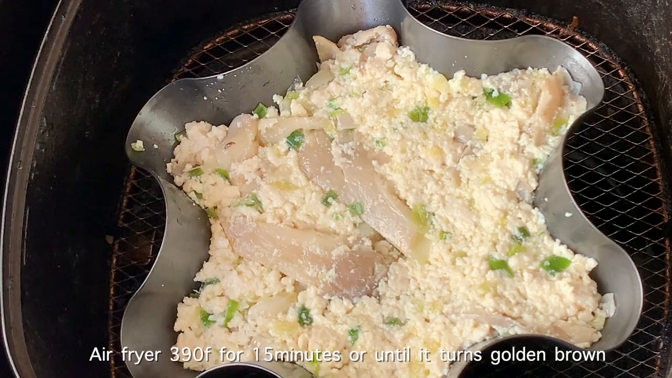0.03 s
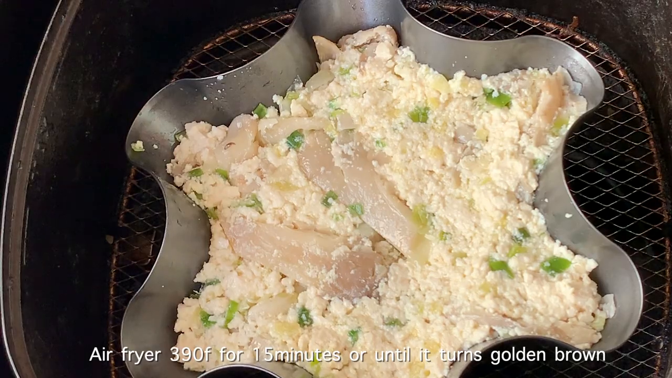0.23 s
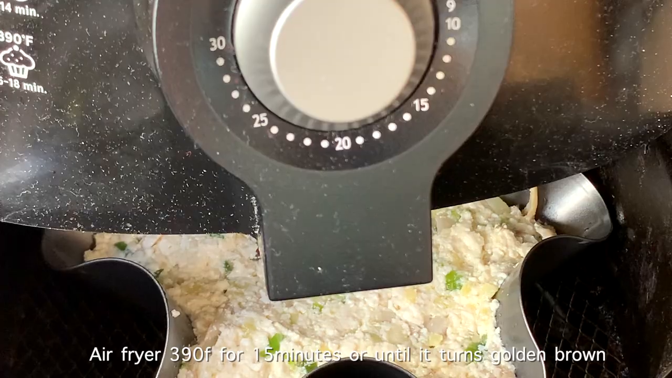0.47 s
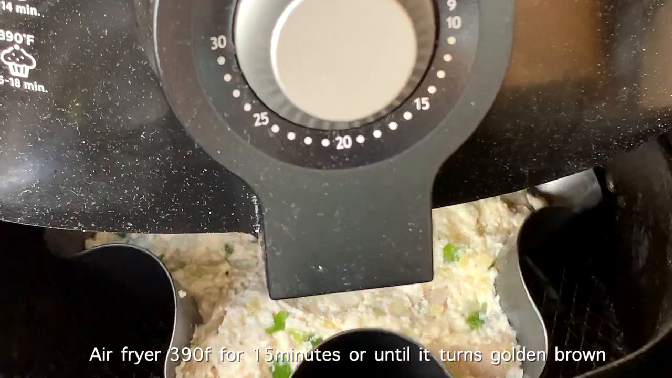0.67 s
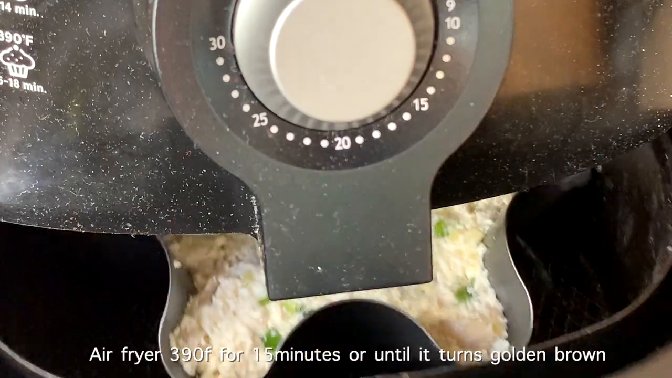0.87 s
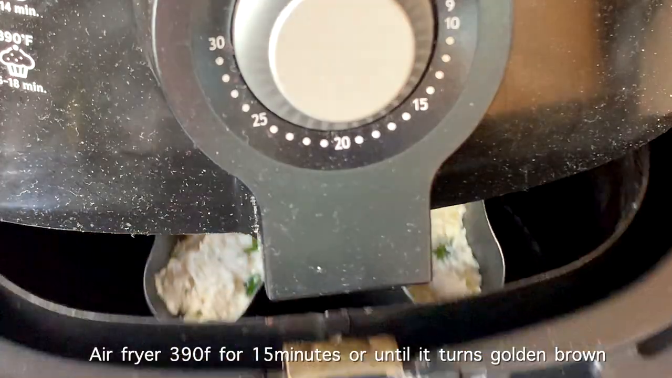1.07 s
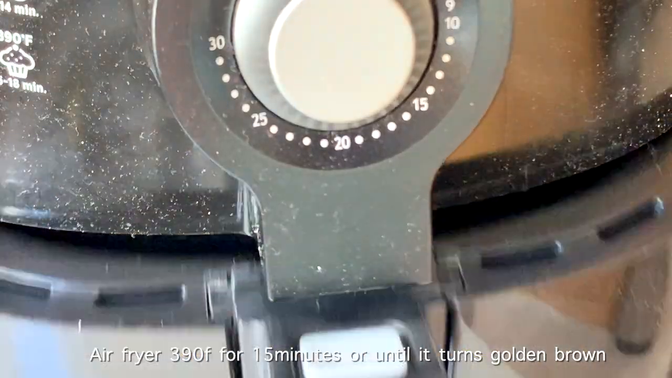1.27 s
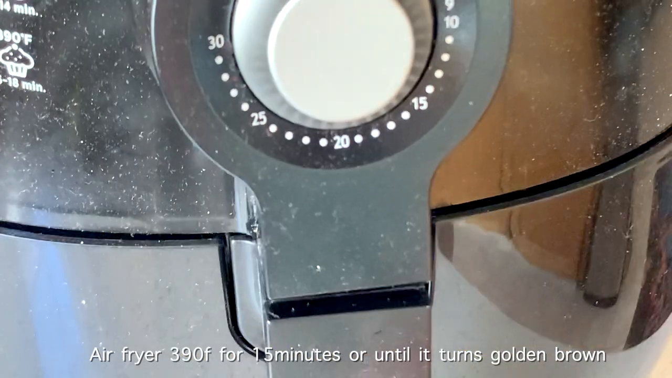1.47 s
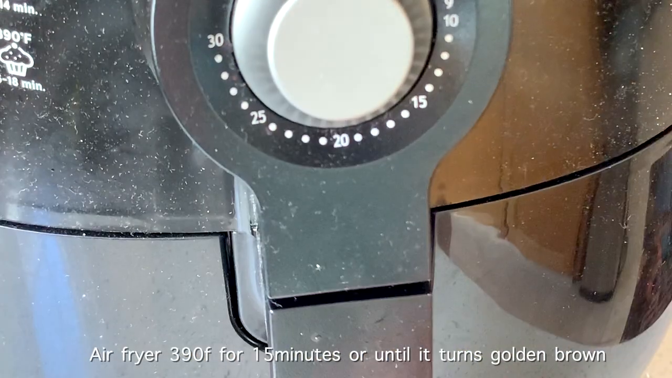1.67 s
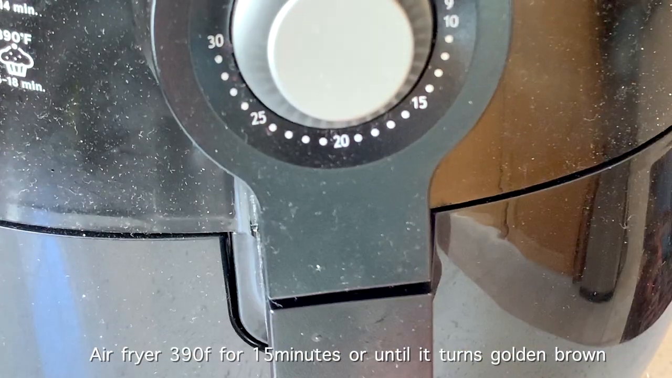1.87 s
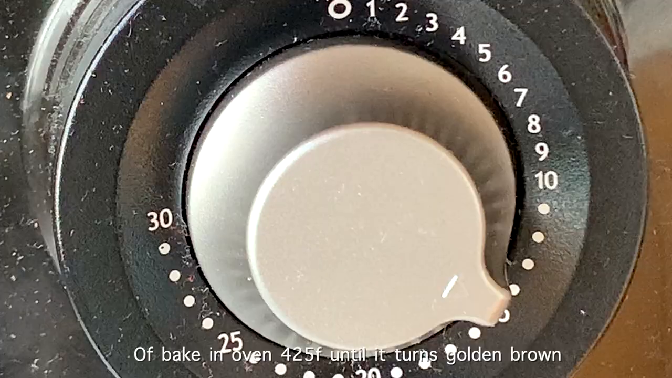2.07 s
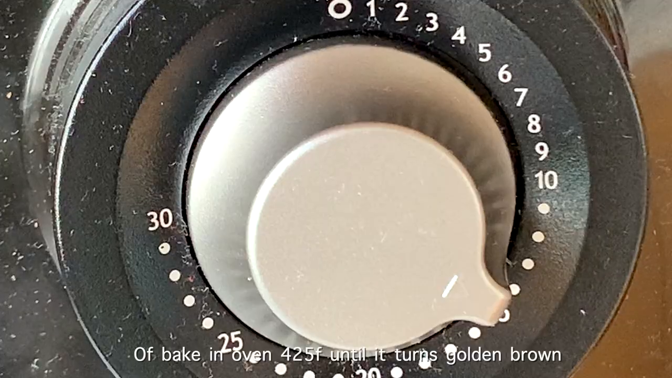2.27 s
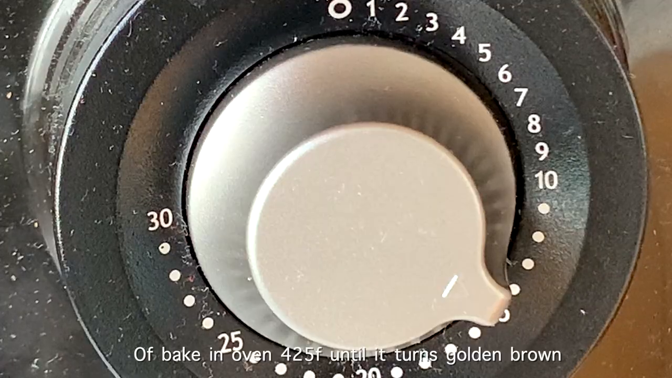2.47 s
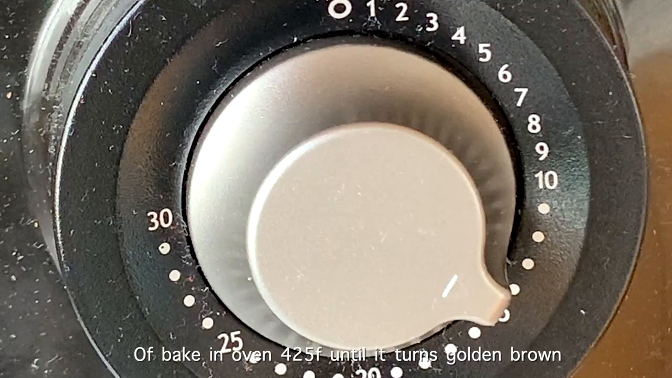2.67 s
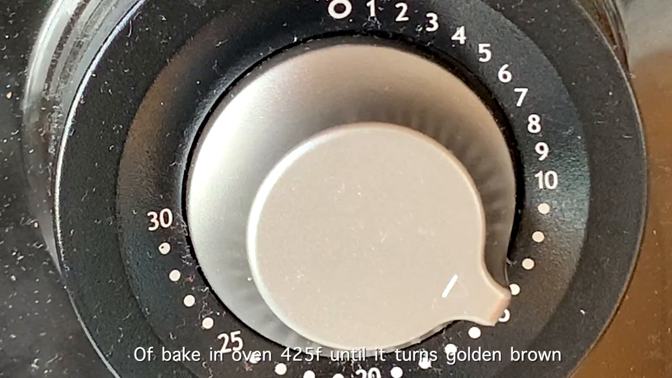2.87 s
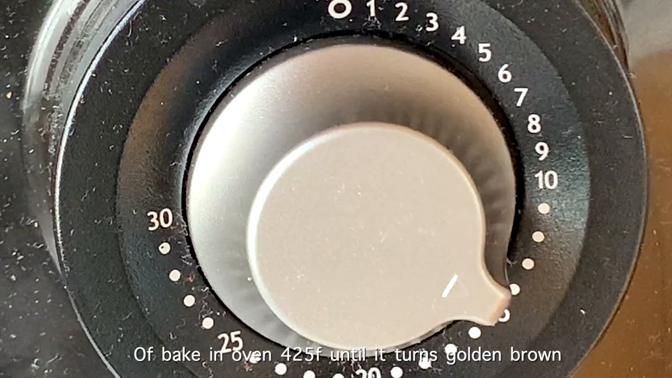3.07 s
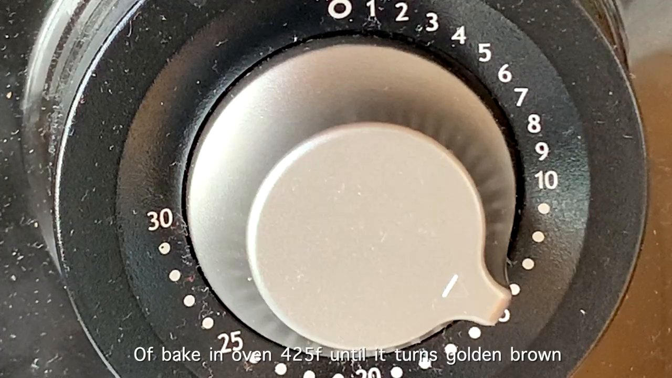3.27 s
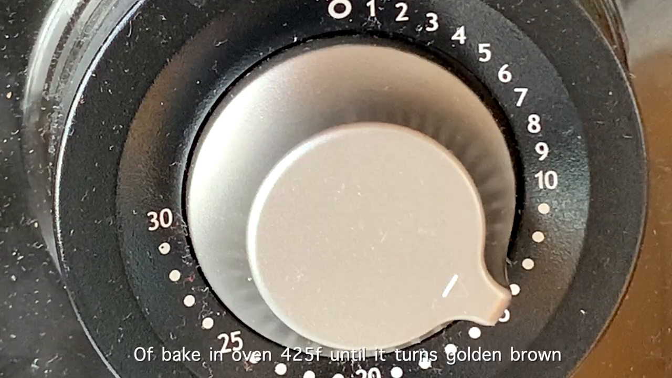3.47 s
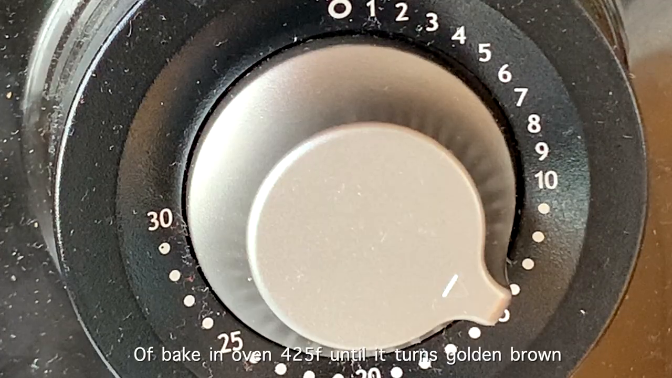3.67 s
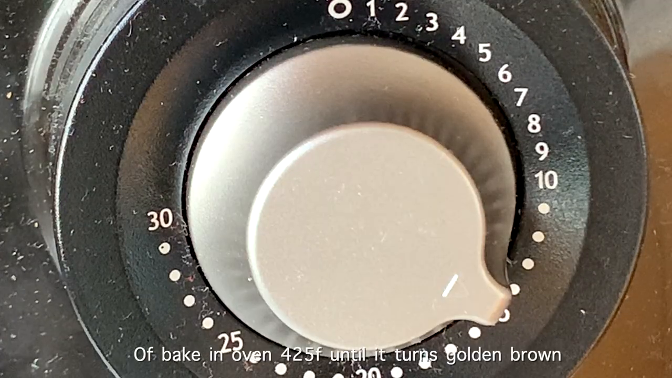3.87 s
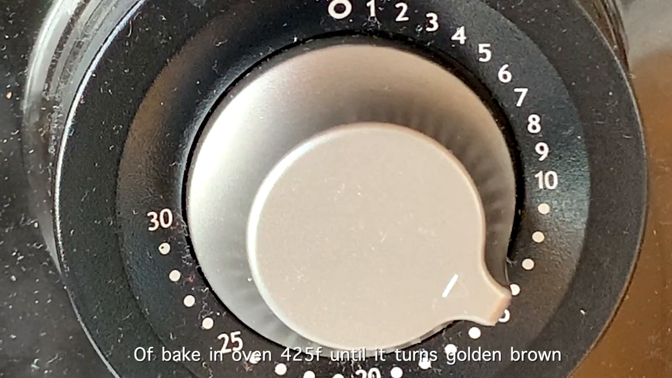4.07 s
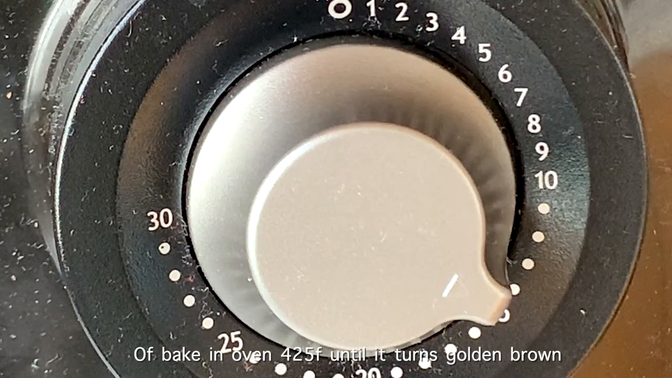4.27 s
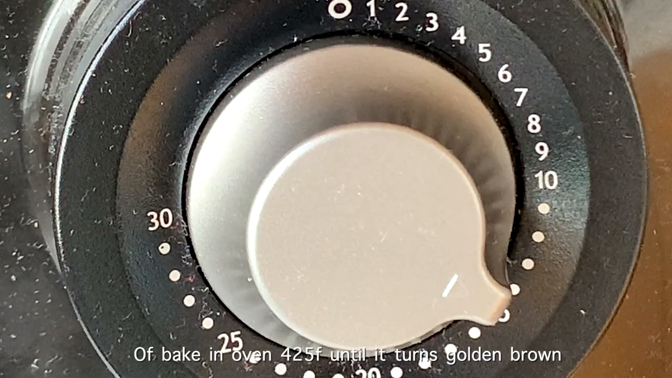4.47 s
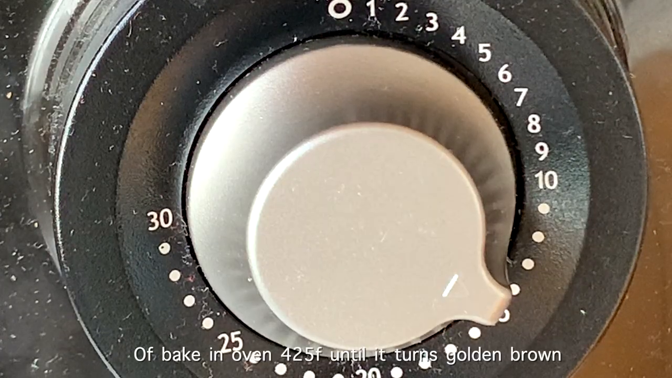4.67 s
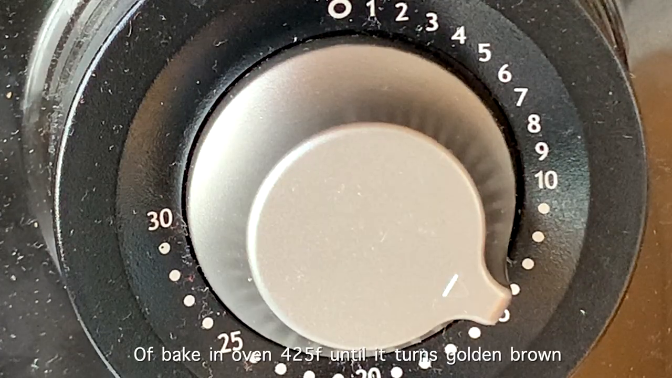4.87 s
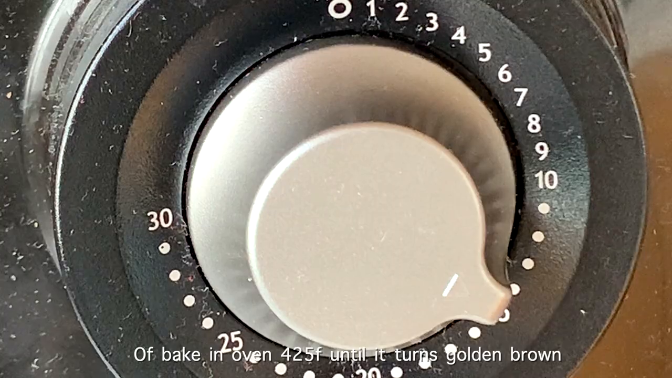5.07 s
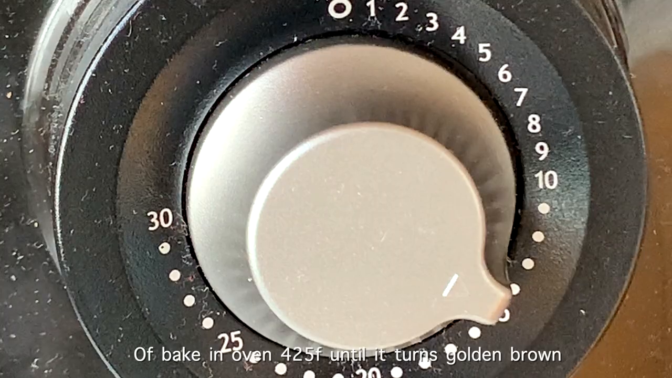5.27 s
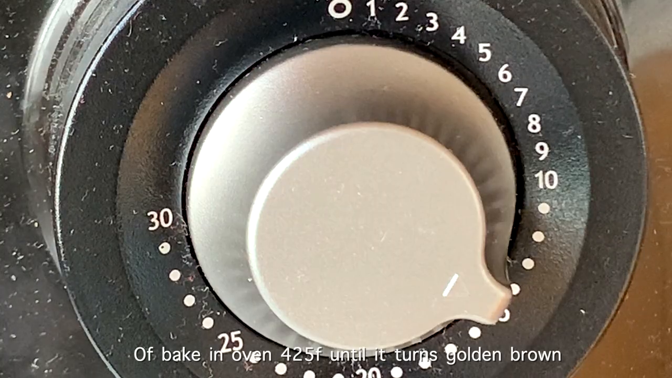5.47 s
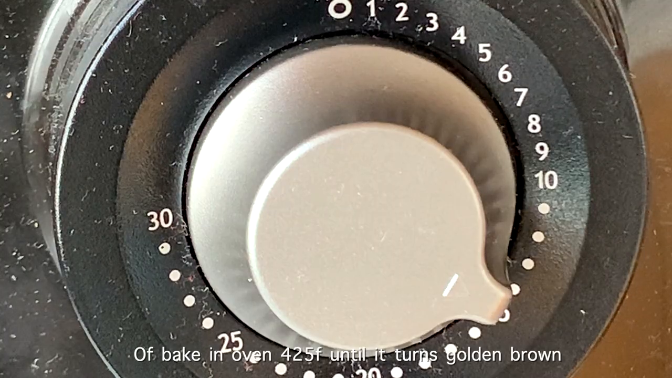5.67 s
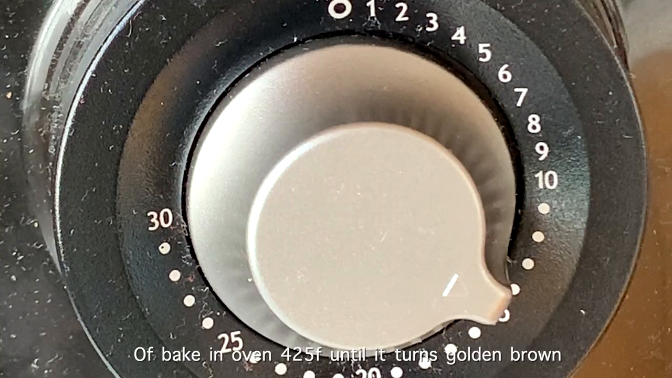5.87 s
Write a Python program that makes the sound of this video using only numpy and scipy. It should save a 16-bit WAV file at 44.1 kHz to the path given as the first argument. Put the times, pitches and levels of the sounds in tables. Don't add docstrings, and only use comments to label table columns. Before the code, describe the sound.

In a quiet, hard-walled kitchen, a hand takes the handle with a faint rub and tiny squeak, then pushes an air fryer basket in: light knocks, gritty scraping, and a dense clatter as it latches with a hollow boom. After a brief fading tail, a hard cut brings the running fryer close to the microphone, a steady low roar with motor hum, rapid ticking and occasional steam hiss.

```python
import sys
import numpy as np
from scipy import signal
from scipy.fft import rfft, irfft, next_fast_len
from scipy.io import wavfile
from scipy.ndimage import uniform_filter1d

SR = 44100
rng = np.random.default_rng(int(sys.argv[2]) if len(sys.argv) > 2 else 0)


def bounce(signal):
    frames = np.transpose(np.atleast_2d(signal))
    limited = np.clip(frames, -1, 1)
    pcm = np.round(limited * 32767).astype(np.int16)
    wavfile.write(sys.argv[1], SR, pcm)


def boost(x):
    u = np.asarray(x, float) / 20
    return 10 ** u


N = 261504
PAD = next_fast_len(N + 4096)
TIME = np.arange(N) / SR
BIN_HZ = np.maximum(np.fft.rfftfreq(PAD, 1 / SR), 1)
CHANGE_S = 2.104
LATCH_S = 1.556

# hz, level_db, t60_s
HOUSING_MODES = [(225, -9, 0.18), (322, -11.5, 0.2), (460, 4, 0.1), (599, -6.5, 0.086), (700, -3, 0.073),
                 (731.4, -2, 0.14), (866, -11.5, 0.34), (975, -12.5, 0.067), (1100, -5.5, .1),
                 (1360, -16.5, .1), (1560, -22, .08), (1870, -17, .08), (2510, -17, .08)]
# start_s, level_db, pitch_hz
HELD_PANELS = [(1.223, -10.5, 225), (1.224, -13.5, 322), (1.367, -15.5, 310), (1.388, -13, 322),
               (1.405, -3, 638), (1.406, -5, 325), (1.418, -6, 177.6), (1.508, -6, 656), (1.515, -7.5, 313),
               (1.520, -17, 150)]
# start_s, level_db, pitch_hz
LOOSE_PANELS = [
    (1.011, -26.5, 254),
    (1.012, -24.5, 710),
    (1.232, -18, 412),
    (1.285, -30.5, 188),
    (1.372, -17, 177.2),
]
# start_s, level_db, pitch_hz
FREE_PANELS = [(.660, -40.5, 256), (.662, -50, 750), (.664, -36, 975), (.665, -38.5, 460), (.70, -41, 225),
               (1.011, -33.5, 1890), (1.011, -36.5, 1075), (1.03, -41.5, 322), (1.222, -25, 2950),
               (1.226, -33, 710), (.36, -67, 720), (1.492, -17, 5000), (1.516, -30, 1800)]


def level(x, db):
    return x * boost(db) / np.sqrt(np.mean(x ** 2))


def over_hz(table):
    hz, db = np.transpose(table)
    return np.interp(np.log(BIN_HZ), np.log(hz), db)


def back(spectrum):
    return irfft(spectrum, PAD)[..., :N]


def band(x, lo_hz, hi_hz):
    sos = signal.butter(2, [lo_hz, min(hi_hz, .45 * SR)], "band", fs=SR, output="sos")
    return signal.sosfilt(sos, x)


def walk(rate_hz):
    hold = int(SR / rate_hz)
    steps = np.repeat(rng.standard_normal(N // hold + 1), hold)
    return 0.92 * uniform_filter1d(uniform_filter1d(steps, hold), hold)[:N]


def stereo(db, mid=None, wide_db=0.):
    # hz, side_minus_mid_db
    width_hz_db = [(60, -15.5), (150, -23), (400, -13), (800, -4.5), (1300, -3.5), (2400, 1), (8000, 0)]
    if mid is None:
        mid = rng.standard_normal(N)
    scrambled = mid * rng.choice([-1., 1.], N)
    side = rfft(scrambled, PAD) * boost(over_hz(width_hz_db) + wide_db)
    return back(boost(db) * (rfft(mid, PAD) + np.array([side, -side])))


def ring(x, hz, t60_s):
    pole = np.exp(2j * np.pi * hz / SR - np.log(1000) / (t60_s * SR))
    return signal.lfilter([1], [1, -pole], x).imag


def swing(table, rise_s):
    out, t = np.zeros(N), TIME[:SR // 2]
    for start_s, db, hz, decay_ms in table:
        envelope = (1 - np.exp(-t / rise_s)) * np.exp(-t * 1000 / decay_ms)
        out[int(start_s * SR):][:len(t)] += boost(db) * np.sin(2 * np.pi * hz * t) * envelope
    return out


def jolt(start_s, rise_s, fall_s):
    t = np.maximum(TIME - start_s, 0)
    return (1 - np.exp(-t / rise_s)) ** 2 * np.exp(-t / fall_s)


def swells(table):
    return sum(boost(db) * np.exp(-np.abs((TIME - s) / half_s) ** 2.6) for s, db, half_s in table)


def knocks():
    # start_s, strength_db, hardness_0_to_1, rattle_ms
    contacts = [(.336, -47.5, 0.4, .5), (0.653, -29.5, 0.05, 19), (.683, -33.5, 0, 3.5),
                (1.005, -24, 0.22, 14.8), (1.217, -26, .65, 14.3), (1.250, -42, .4, 12),
                (1.354, -29, 1, 7.3), (1.365, -20, .37, 11), (1.386, -30, .55, 11), (1.404, -24, 0.6, 7.7),
                (1.417, -30, .45, 13), (1.492, -24.5, 0.84, 5.1), (1.506, -19, .24, 6.8),
                (1.514, -21.5, .15, 7.6), (1.555, -41, .52, 6.2)]
    clack, snap, crack = gains = np.zeros((3, N))
    for start_s, db, hard, rattle_ms in contacts:
        rise_share = 0.38 + (0.17 - 0.38) * hard
        snap_db = -15.5 + (9 + 15.5) * hard
        crack_db = -46 + (14 + 46) * hard
        burst = jolt(start_s, rise_share * rattle_ms / 1000, rattle_ms / 1000)
        gains += np.outer(boost(db + np.array([0, snap_db, crack_db])), burst)
    push = clack * rng.standard_normal(N)
    body = sum(boost(db - 30) * ring(push, hz, t60_s) for hz, db, t60_s in HOUSING_MODES)
    mid_db = over_hz([(250, -17), (600, -6.0), (1800, -11.0), (3500, -25.5), (8000, -42.5)])
    snap_colour_db = over_hz([(1200, -18.5), (2800, 0.5), (5200, -3), (9000, -16), (15000, -32.5)])
    crack_colour_db = over_hz([(3000, -21.5), (6500, 1.5), (10500, 4), (14000, 1.5), (15500, -11.5)])
    mids = level(stereo(mid_db), 0) * clack
    snaps = level(stereo(snap_colour_db), 0) * snap
    cracks = level(stereo(crack_colour_db), 0) * crack
    return body + mids + snaps + cracks


def panel_thuds():
    # start_s, level_db, pitch_hz, decay_ms
    nudges = [
        (.252, -49, 66, 11),
        (.3255, -47, 62, 11),
    ]
    thuds = []
    for table, cycles in ((HELD_PANELS, 1.89), (LOOSE_PANELS, 5.4), (FREE_PANELS, 16.)):
        thuds += [(start_s, db, hz, 1000 * cycles / hz) for start_s, db, hz in table]
    return swing(thuds + nudges, rise_s=0.0021)


def slide():
    # start_s, friction_db
    friction_s_db = [(.5, -90), (.68, -58), (.78, -70.5), (.86, -58.5), (1.19, -55), (1.33, -51.5),
                     (1.39, -35.5), (1.45, -46.5), (1.8, -93)]
    # hz, db_per_hz
    scrape_hz_db = [(350, -29.5), (600, -1.5), (794, -14.5), (864, -3), (1750, -9.5), (2550, -9.5),
                    (4870, -14.5), (11000, -18), (14300, -36), (22000, -120)]
    start_s, friction_db = np.transpose(friction_s_db)
    friction = boost(np.interp(TIME, start_s, friction_db, -140, -140))
    grit = rng.standard_normal(N) * boost(2.0 * rng.exponential(size=N) + 2.0 * walk(56))
    scrape = level(stereo(over_hz(scrape_hz_db[:-2]), grit), 0) * friction
    shake = rng.standard_normal(N) * boost(4 * walk(19))
    modes = sum(boost(db) * ring(shake, hz, t60_s / 3) for hz, db, t60_s in HOUSING_MODES[:5])
    load = boost(-49) * (friction / boost(-58)) ** 0.98 + boost(-73.5)
    return scrape + level(modes, -11) * load


def worktop():
    rise_s = 0.012
    jolts = sum(boost(-44 + .55 * (db + 26)) * jolt(start_s, rise_s, 0.053)
                for start_s, db, hz in HELD_PANELS + LOOSE_PANELS + FREE_PANELS if hz < 260)
    settling = boost(-55.5) * jolt(LATCH_S, rise_s, 0.45)
    shudder = level(band(rng.standard_normal(N), 45, 130), 2.3)
    return shudder * (jolts + boost(-69) + settling)


def handle():
    # centre_s, level_db, half_length_s
    finger_rubs = [
        (.24, -73, .045),
        (.375, -69, 0.042),
    ]
    rub_db = over_hz([(500, -5), (720, -4), (1100, -9.0), (2000, 4.5), (2800, -9), (3700, -2.5),
                      (7000, -12), (13000, -11)])
    rub = level(stereo(rub_db), 0) * swells(finger_rubs)
    squeak_s, squeak_db, half_length_s = .403, -60, 0.019
    squeak_hz, glide_hz_per_s = 451, 420
    hz = (squeak_hz + glide_hz_per_s * (TIME - squeak_s)) * (1 + 0.025 * walk(66))
    squeak = swells([(squeak_s, squeak_db, half_length_s)]) * np.sin(2 * np.pi * np.cumsum(hz) / SR)
    return rub + squeak


def boom():
    # level_db, decay_s
    cavity_stages = [
        (-23.5, .035),
        (-42.5, 0.26),
    ]
    phase = 2 * np.pi * np.cumsum(160 * (1 + 0.013 * walk(30))) / SR
    fade = sum(boost(db) * jolt(LATCH_S, 0.0025, decay_s) for db, decay_s in cavity_stages)
    hum = np.sqrt(2) * fade * boost(3.0 * walk(18)) * np.sin(phase)
    grate = level(band(rng.standard_normal(N), 546, 634), -72) * jolt(LATCH_S, 0.063, 0.65)
    return hum + grate


def room(x):
    # hz, level_db, t60_s
    wall_bands = [(150, -8, 0.47), (400, -17.5, 0.45), (997, -7, 0.51), (2500, -7.5, 0.52),
                  (6140, -7.5, 0.49), (12140, -11.5, 0.35)]
    table_hz, table_db, table_t60_s = np.transpose(wall_bands)
    x = x.mean(axis=0)[:int(CHANGE_S * SR) + 200]
    out = np.zeros((2, N))
    for hz in 110 * np.sqrt(2) ** np.arange(15):
        t60_s = np.interp(hz, table_hz, table_t60_s)
        keep = np.exp(-2 * np.log(1000) / (t60_s * SR))
        energy = uniform_filter1d(band(x, hz / 1.08, hz * 1.26) ** 2, 300, origin=149)
        tail = np.sqrt(np.abs(signal.lfilter([1 - keep], [1, -keep], energy)))
        noise = rng.standard_normal((2, len(x)))
        noise += max(1 - hz / 900, 0) * 1.2 * noise.sum(axis=0)
        diffuse = level(band(noise, hz / 1.19, hz * 1.19), np.interp(hz, table_hz, table_db))
        out[:, :len(x)] += tail * diffuse
    return out


def air_flow():
    # hz, db_per_hz
    air_hz_db = [(15, -52), (25, -43), (47, -19), (96, -13.5), (160, 3), (229, -12), (296, -8),
                 (505, -19.5), (545, -19.5), (619, -24.5), (1400, -24), (2450, -31), (2640, -34),
                 (4630, -35.5), (11000, -43.5), (14300, -110), (22000, -120)]
    # hz, width_hz, gain_db
    duct_modes = [(165, 70, 2.5), (298, 30, 5), (1000, 250, 3), (1093, 20, 5), (1200, 60, -6),
                  (1385, 25, 6), (1783, 30, 6), (2060, 70, 3), (2185, 70, -8), (2240, 30, 4), (2385, 40, 5),
                  (2480, 110, 4), (2650, 150, -4), (2800, 50, 5), (3320, 140, 5), (3420, 60, -5),
                  (3750, 70, 4), (4370, 120, -4), (4630, 180, 6), (4770, 100, -3), (4970, 60, 4),
                  (5300, 500, -3), (5820, 60, 4)]
    colour_db = over_hz(air_hz_db[:-3] + [(9000, -42), (13000, -50.5)])
    colour_db += sum(db / (1 + (2 * (BIN_HZ - hz) / width_hz) ** 2) for hz, width_hz, db in duct_modes)
    ripple = uniform_filter1d(uniform_filter1d(rng.standard_normal(len(BIN_HZ)), 120), 120)
    colour_db += 1.6 * np.sqrt(180) * ripple * (BIN_HZ > 350)
    air = rfft(level(stereo(colour_db), -32.5), PAD)
    swell, out = walk(2.235), 0
    for lo_hz in 2. ** np.arange(5, 15):
        octave = back(air * ((BIN_HZ >= lo_hz) & (BIN_HZ < 2 * lo_hz)))
        out = out + octave * boost(.35 * swell + .7 * walk(12))
    return out


def motor():
    # shaft_multiple, level_db
    shaft_tones = [
        (1, -56),
        (2, -52),
        (11, -42),
        (22, -68),
    ]
    shaft_hz = 547.4 / 11
    turn = 2 * np.pi * np.cumsum(shaft_hz * (1 + 0.0014 * walk(2.86))) / SR
    return sum(np.sqrt(2) * boost(db + 0.6 * walk(17)) * np.sin(k * turn + k) for k, db in shaft_tones)


def vent():
    # centre_s, level_db, half_length_s
    steam_spits = [
        (2.765, -66.5, .012),
        (3.842, -54.5, .012),
        (4.74, -47, 0.076),
        (5.49, -60, .04),
    ]
    hiss = level(stereo(over_hz([(3000, -8.0), (8000, -10.0), (12500, -11.0), (15000, -5.5)])), 2.5)
    return hiss * (boost(-66 + 1.2 * walk(3)) + swells(steam_spits))


def whistles():
    # hz, width_hz, level_db
    casing_gaps = [(790, 60, -58), (1093, 25, -63), (1385, 25, -62), (1783, 25, -64), (2420, 60, -65)]
    out = 0
    for hz, width_hz, db in casing_gaps:
        colour_db = -10 * np.log10(1 + (2 * (BIN_HZ - hz) / width_hz) ** 4)
        out = out + level(stereo(colour_db, wide_db=3.5), db) * boost(4.1 * walk(5))
    return out


def timer():
    beat = np.cumsum(42.5 * (1 + 0.066 * walk(11))) / SR
    size = boost(1.8 * rng.standard_normal(400))[beat.astype(int)]
    strike = boost(-47) * size * np.exp(-(beat % 1) / .08)
    return level(stereo(over_hz([(5000, -30), (9000, -0.5), (13000, -2.0), (15500, 1)])), 0) * strike


def bumps():
    # start_s, level_db, pitch_hz, decay_ms
    grip_shifts = [
        (3.578, -20, 61, 26),
        (3.725, -26, 58, 20),
        (3.845, -31, 55.3, 36),
    ]
    return swing(grip_shifts, rise_s=0.0036)


def fryer():
    return air_flow() + motor() + vent() + whistles() + timer() + bumps()


def kitchen():
    # hz, db_per_hz
    tone_hz_db = [(30, 4.5), (120, 0.5), (300, -7), (450, -16.5), (800, -32), (1100, -36.5), (1400, -25.5),
                  (1700, -37), (5000, -43), (9000, -38.5), (14000, -44.5), (15700, -25)]
    return level(stereo(over_hz(tone_hz_db), wide_db=9.5), -66) * boost(0.7 * walk(9.8))


def scene():
    near = knocks() + panel_thuds() + slide() + worktop() + handle()
    before = near + room(near) + boom() + kitchen()
    after = np.clip((TIME - CHANGE_S) / 0.0014, 0, 1)
    return before * (1 - after) + fryer() * after


def low_pass(x):
    return signal.sosfilt(signal.butter(12, 15640, fs=SR, output="sos"), x)


def record(dry):
    # hz, left_minus_right_db
    tilt_hz_db = [(60, -0.5), (110, -0.17), (200, -1.0), (380, -2.6), (700, 1.8), (1290, 1.2), (2380, 0.31),
                  (4400, -1.7), (8120, -1), (15000, 0.63)]
    port_lag_s, comb_null_hz, comb_step_hz = .00012, 11900, 3050
    tilt_db = over_hz(tilt_hz_db)
    treble_db = over_hz([(14600, 0), (15200, -3.0), (16000, -5)])
    left, right = rfft(dry, PAD) * boost(treble_db + np.outer([.5, -.5], tilt_db))
    shared = np.clip((BIN_HZ - 6500) / 5000, 0, 1)
    turn = np.exp(1j * np.pi * (1 + 2 * (BIN_HZ - comb_null_hz) / comb_step_hz))
    late = right * np.exp(-2j * np.pi * BIN_HZ * port_lag_s)
    right = np.sqrt(1 - shared ** 2) * late + shared * turn * left * boost(-tilt_db)
    ports = back(np.array([left, right]))
    mix = signal.sosfilt(signal.butter(4, 42, "high", fs=SR, output="sos"), ports)
    return low_pass(mix)


dry = scene()
out = record(dry)
bounce(out)
```